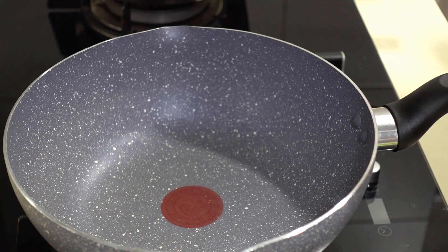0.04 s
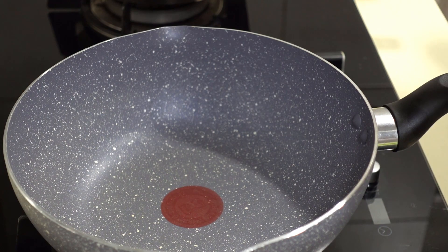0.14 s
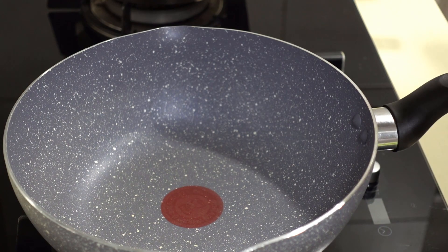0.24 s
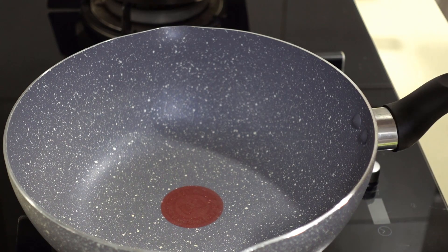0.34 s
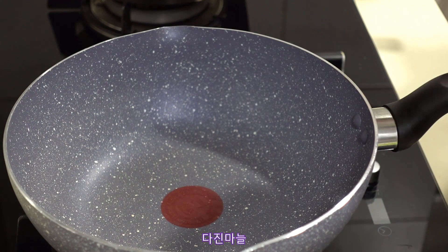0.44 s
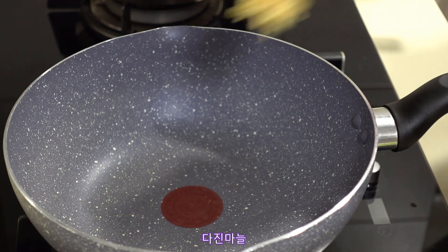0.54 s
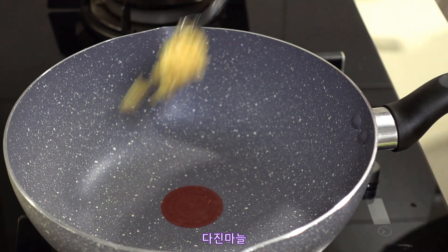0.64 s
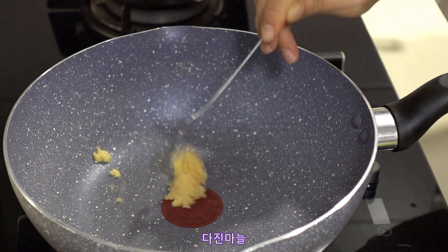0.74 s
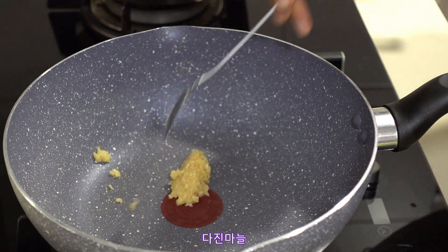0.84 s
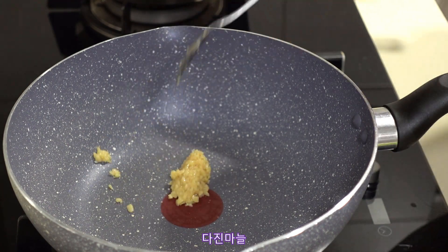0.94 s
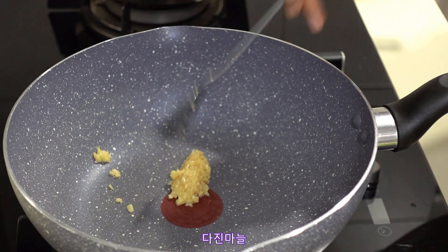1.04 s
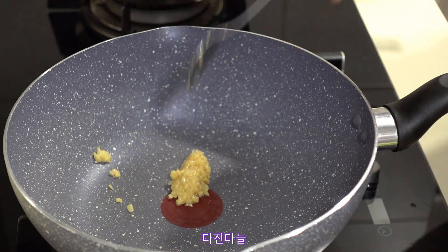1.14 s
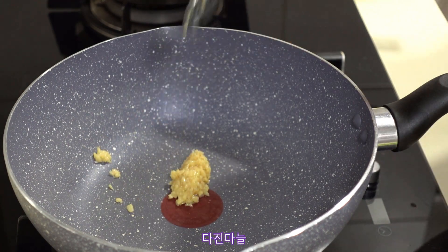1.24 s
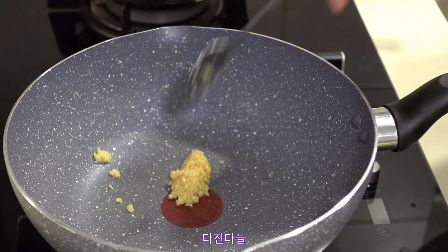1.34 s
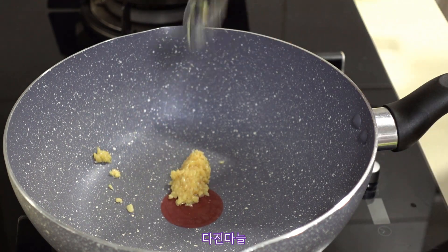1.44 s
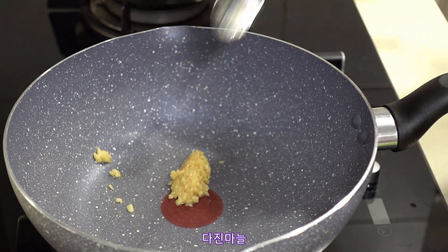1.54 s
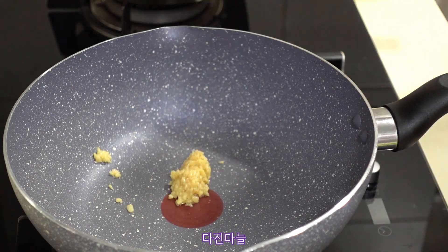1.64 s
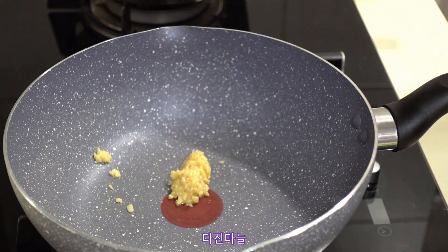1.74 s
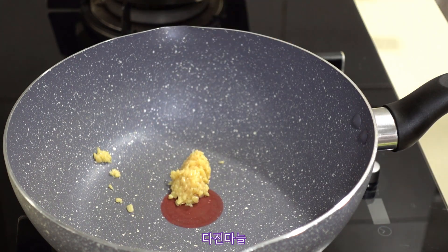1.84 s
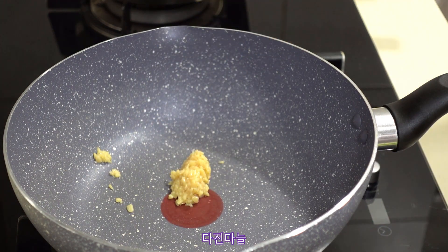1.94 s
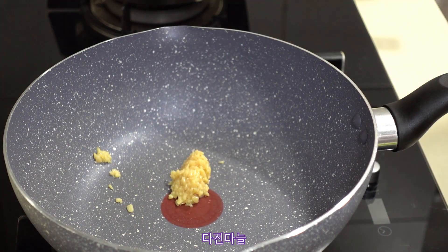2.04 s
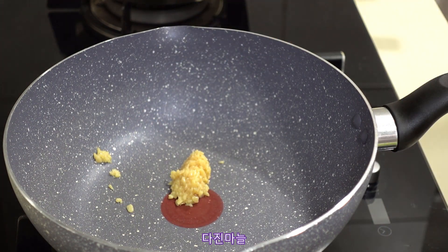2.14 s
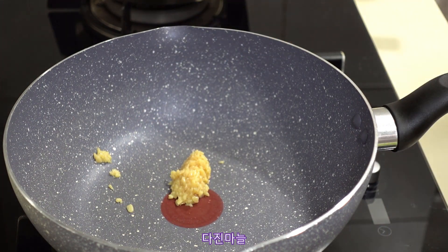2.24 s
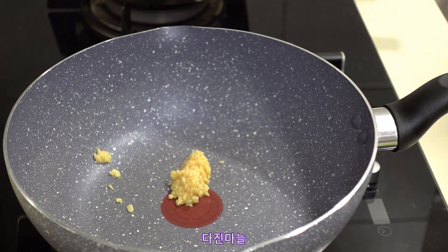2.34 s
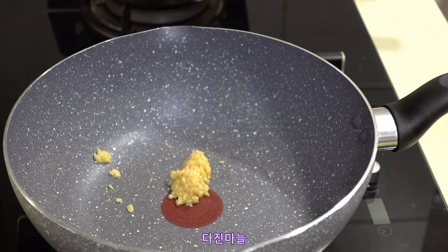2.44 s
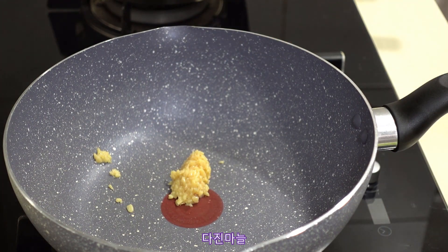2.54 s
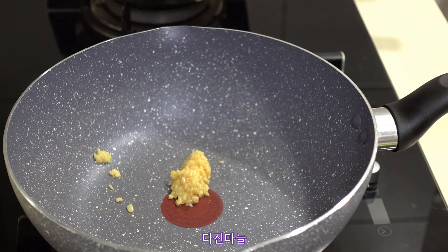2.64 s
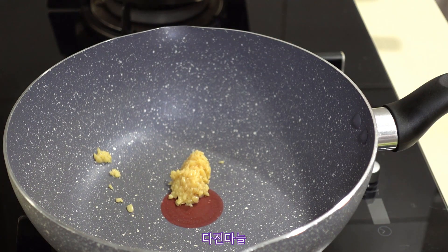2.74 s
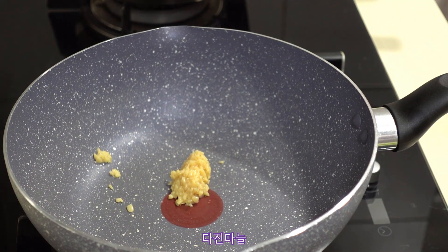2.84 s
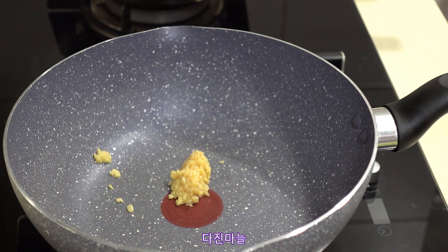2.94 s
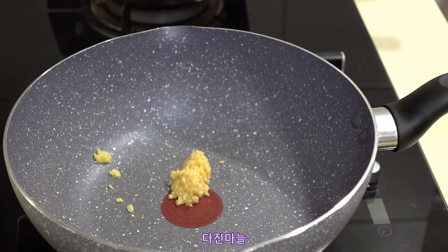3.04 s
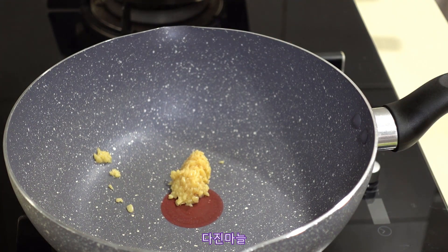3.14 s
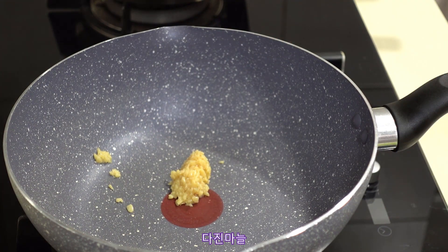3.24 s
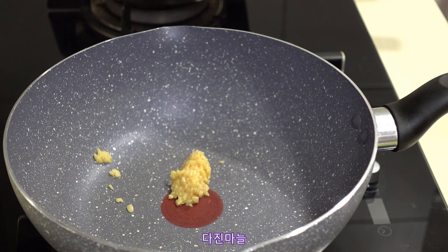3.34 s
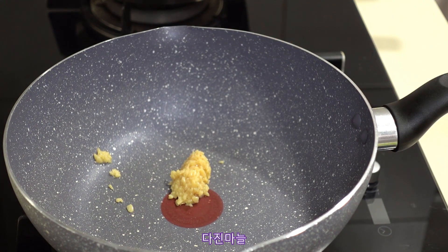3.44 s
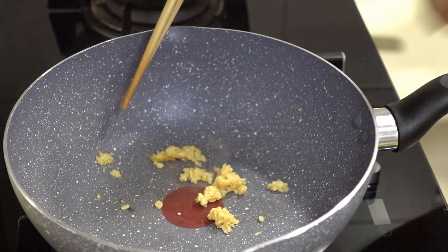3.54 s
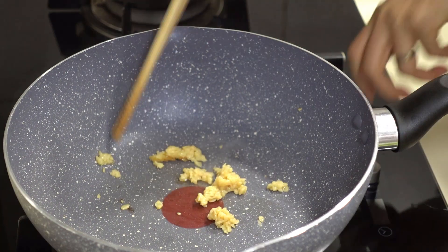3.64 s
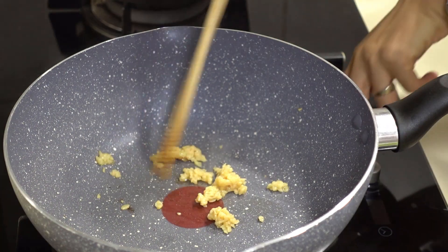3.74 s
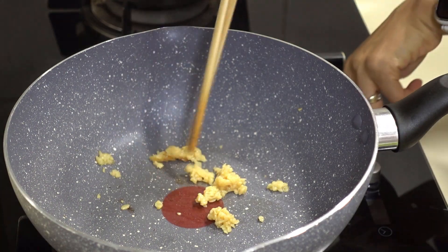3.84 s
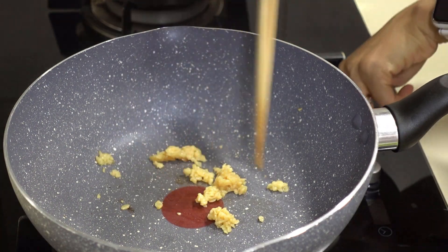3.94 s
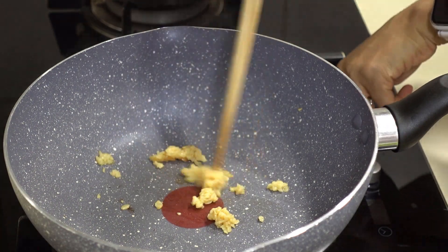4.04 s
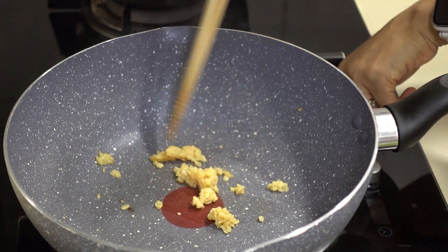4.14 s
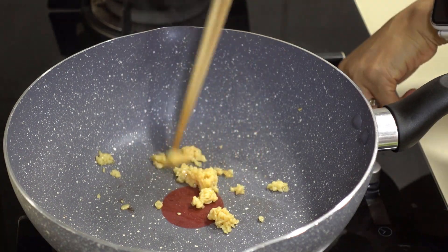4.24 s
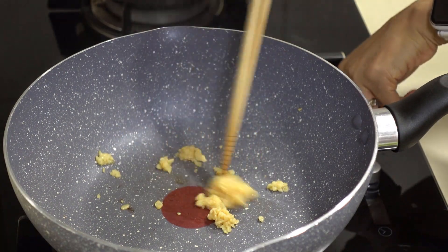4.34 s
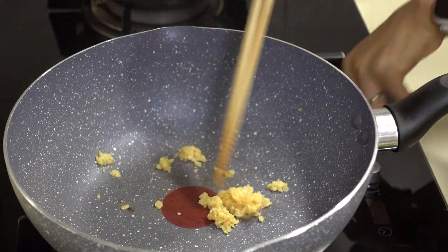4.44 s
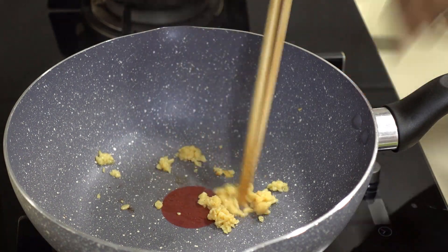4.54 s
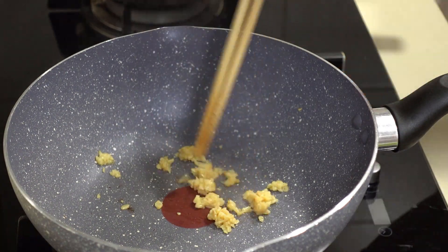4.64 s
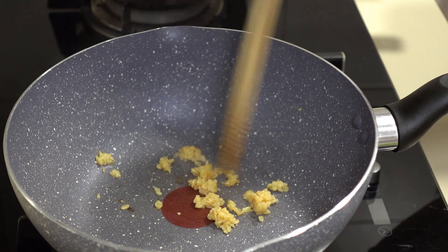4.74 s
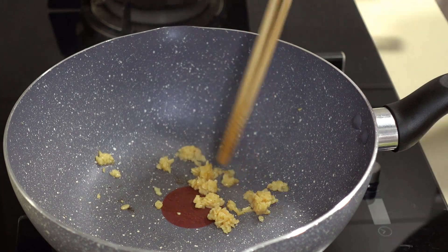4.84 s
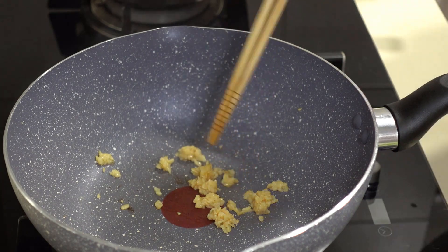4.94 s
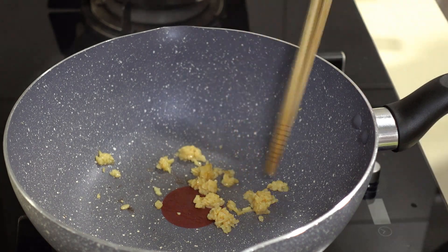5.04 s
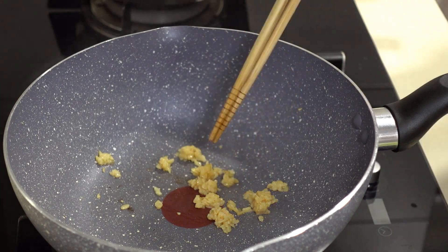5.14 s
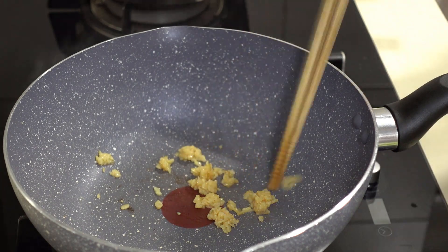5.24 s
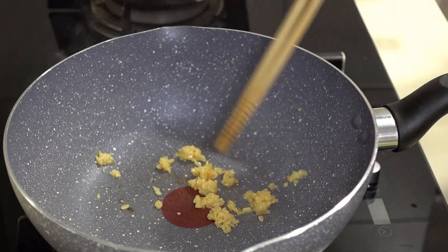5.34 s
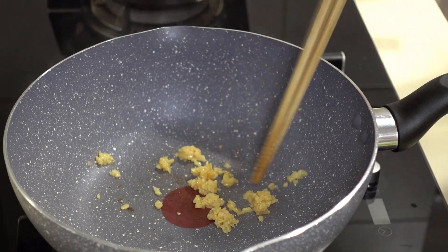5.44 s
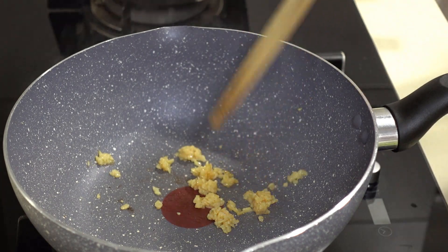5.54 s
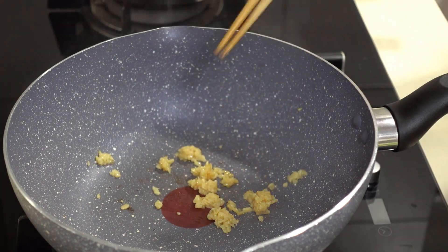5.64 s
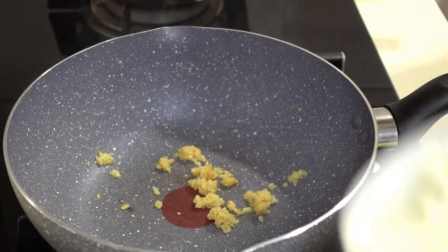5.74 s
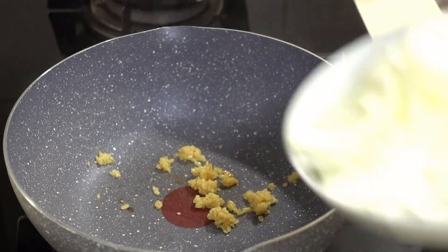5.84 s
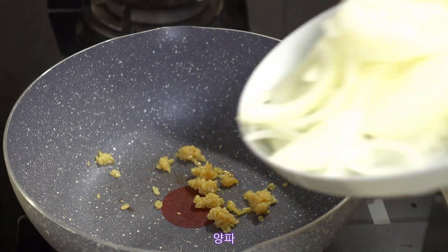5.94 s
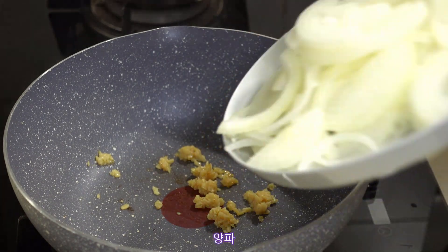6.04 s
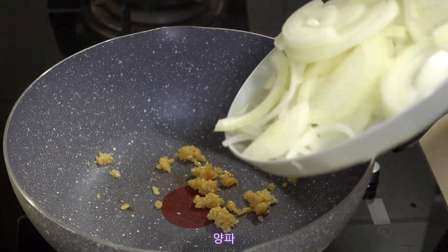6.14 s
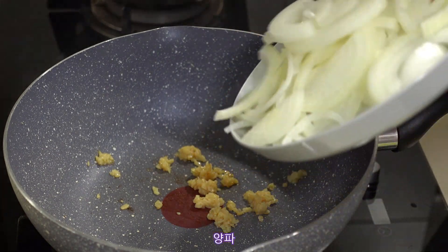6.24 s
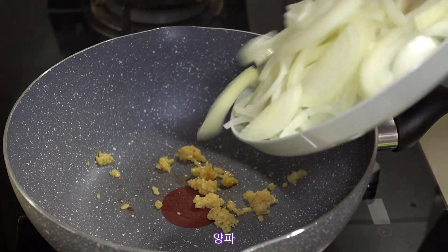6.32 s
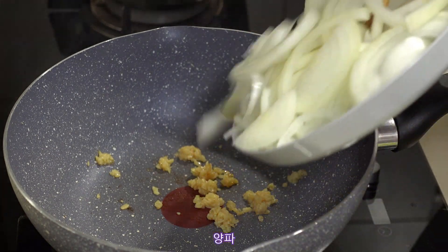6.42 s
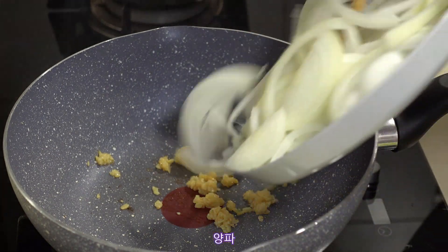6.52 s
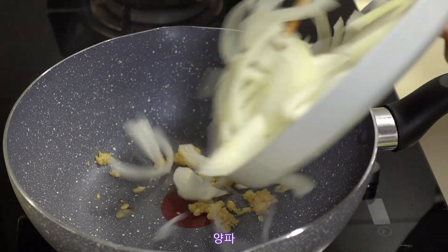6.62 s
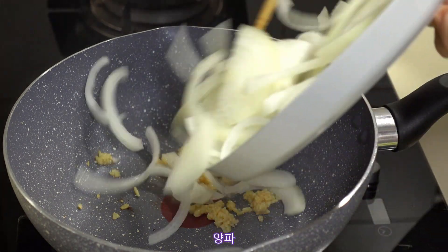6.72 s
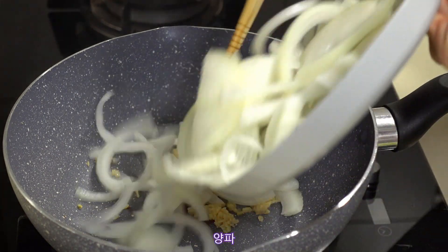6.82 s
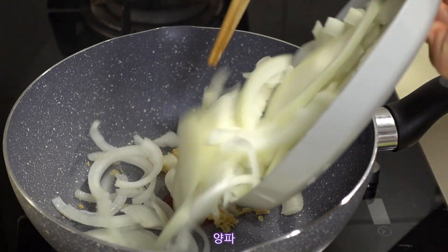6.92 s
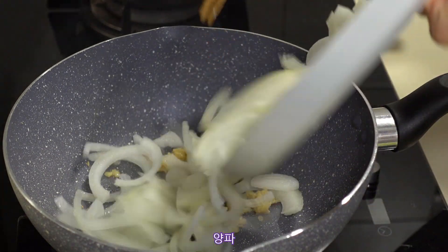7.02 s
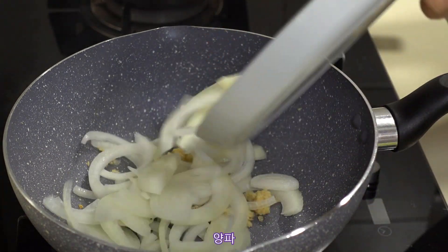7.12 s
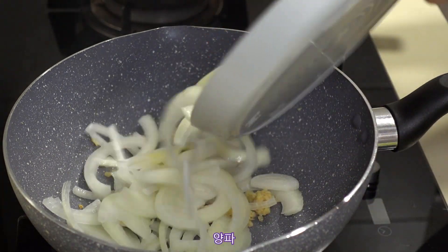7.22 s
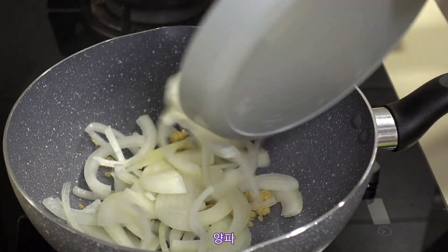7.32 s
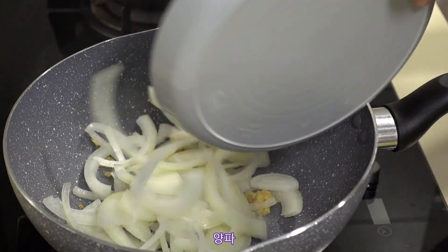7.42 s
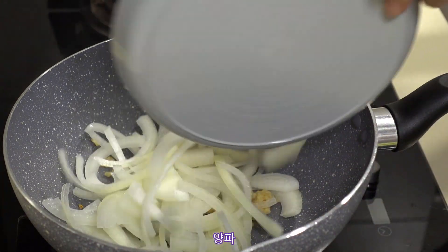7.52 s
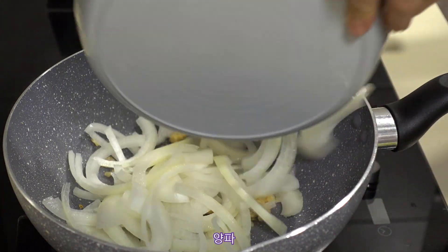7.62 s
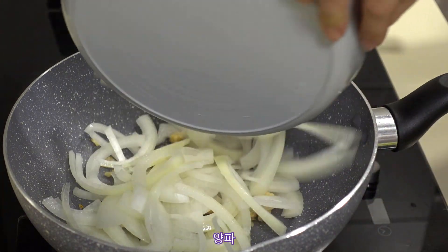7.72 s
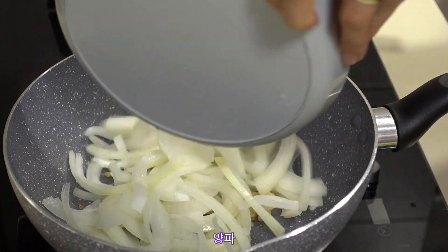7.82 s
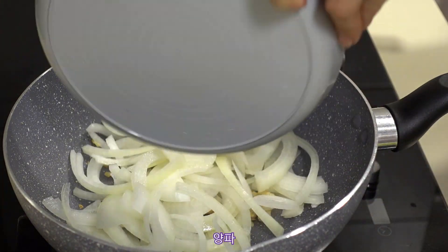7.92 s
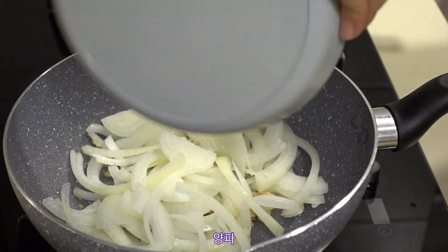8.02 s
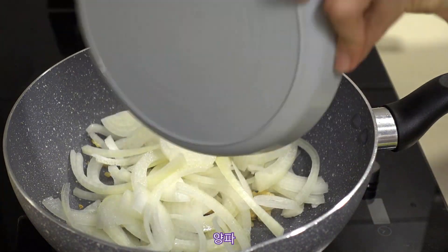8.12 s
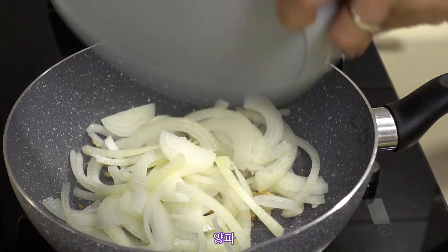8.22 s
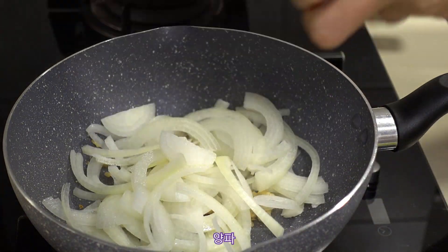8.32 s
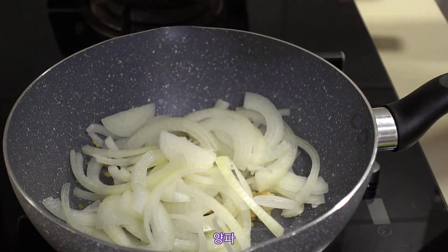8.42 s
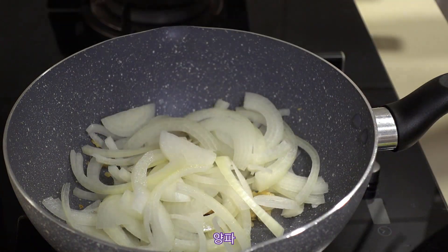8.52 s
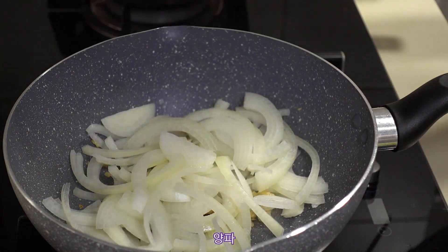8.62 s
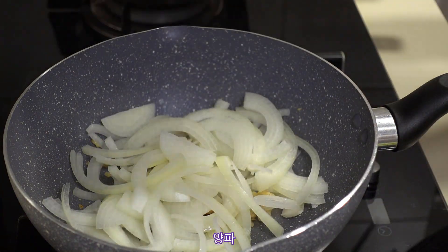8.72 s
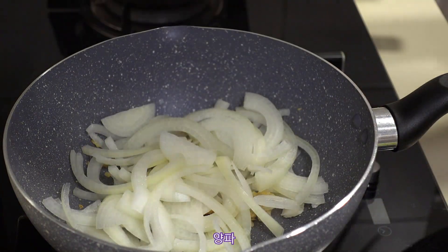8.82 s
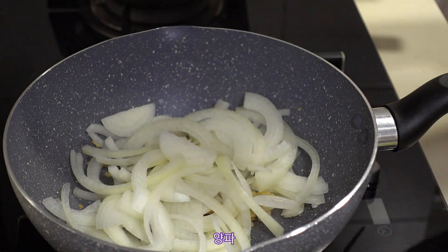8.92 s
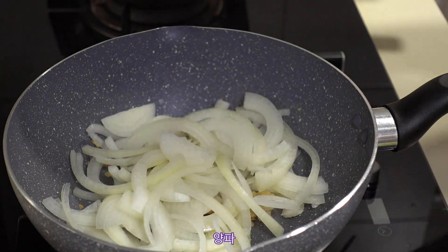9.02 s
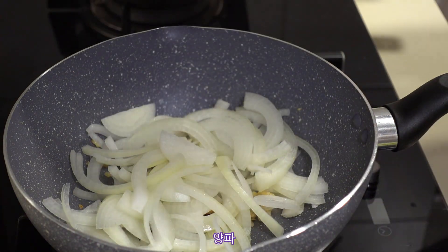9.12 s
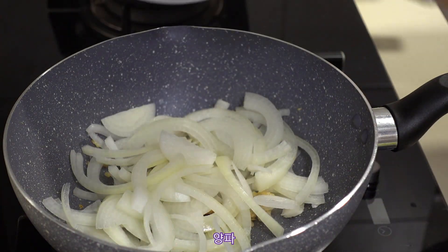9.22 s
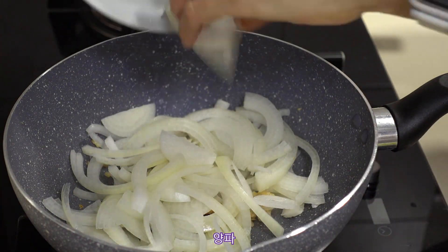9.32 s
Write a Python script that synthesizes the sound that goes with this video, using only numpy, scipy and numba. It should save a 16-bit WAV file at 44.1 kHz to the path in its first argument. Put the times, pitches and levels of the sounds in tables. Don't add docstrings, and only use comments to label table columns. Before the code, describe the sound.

Close, crisp pan frying bursts in after a spoon clink, swells wetter as onion lands with soft patters, and a plate scrapes the counter at the end.

```python
import sys
import numpy as np
from scipy import signal
from scipy.fft import rfft, irfft, next_fast_len
from scipy.io import wavfile
from scipy.ndimage import uniform_filter1d, map_coordinates
from numba import njit

SR = 44100
rng = np.random.default_rng(int(sys.argv[2]) if len(sys.argv) > 2 else 0)


def nominal_scale(level):
    x = np.asarray(level, float) / 20
    return 10 ** x


def master(y):
    cut = np.clip(np.atleast_2d(y).T, -1, 1)
    pcm = np.round(cut * 32767)
    wavfile.write(sys.argv[1], SR, pcm.astype(np.int16))


N = 413216
T = np.arange(N) / SR
CHANGE_S, FADE_S = 3.496, 0.032
LANDS_S, FLARE_S, FLARE_POWER, LAG_S = .725, .106, 1.1, 0.11

# (time [s], heat [dB], juice in the oil [0-1])
FRY_COURSE = [(.9, -1, 0.46), (1.21, 0, 0), (1.66, -0.5, 0), (2.1, 0.5, 0.08), (2.42, -1, 0.07),
              (2.47, 0.5, 0.05), (2.86, 0.5, 0.05), (3.3, 0, 0.1), (3.6, 0, .15), (4.03, 0, 0.18),
              (4.1, -2, 0.3), (4.5, -1, 0.16), (5.14, -1.5, 0.33), (5.8, -1, 0.39), (6.4, -2, 0.45),
              (7.2, 0, 0.45), (8.05, 0.5, 0.9), (9.37, 1, 0.79)]
BUBBLE_HZ = (10500, 7500, 4800, 2800, 1400)
# (frequency [Hz], density [dB per Hz])
FRY_SPECTRUM = [(240, -36), (400, -37), (581, -26.5), (723, -15), (941, -22), (1050, -34.5), (1130, -14),
                (2760, -8), (15000, 6.5), (15700, 7), (16500, -61)]
# (frequency [Hz], side minus mid [dB])
FRY_WIDTH = [(200, -11), (380, -19), (700, -10), (1290, -16), (2380, -9), (4400, -4.5), (8120, -4),
             (11300, 2), (13000, -2), (15000, -8.5)]
# (frequency [Hz], left minus right [dB])
FRY_LEFT_RIGHT = [(60, -6), (110, -1.5), (200, 0.0), (380, -16.5), (700, 0.0), (1290, 0.5), (2380, -0.5),
                  (4400, 0.5), (8120, -1.0), (15000, -2.5)]
# (time [s], middle bubble boost [dB], rise [s], fall [s])
FRESH_SURGES = [
    (2.6, 2, .12, 0.63),
    (4.3, 9, 0.22, 0.2),
    (5.53, 3.5, 0.22, 0.033),
    (5.82, 2, 0.064, 0.15),
    (6.85, 9, 0.33, 0.93),
    (8.3, 3, 0.68, 3.6),
]
# gain at full juice [dB], share of a fresh surge [ratio]
JUICE_DB, FRESH_SHARE = (0.5, 2.5, 7, 13, 4.5), (0, 0.69, 0.35, 0.17, 0.43)
# level missing as the food lands [dB], level still missing after [dB]
FLARE_DB, LAG_DB = (-50, -57, -36, -19, -13), (-1.5, 1, -9, -21, -3)
# (frequency [Hz], width [Hz], level [dB])
PAN_MODES = [(864, 5.5, -5), (951, 13, 8.5), (1817, 7.1, 5), (2130, 24, -15), (2960, 7.2, -2.5),
             (3215, 8.3, -5.5), (3526, 18, -1.5), (4400, 15, -2), (4710, 18, -6.5)]
RING_DB, BARE_DB, BARE_S, COVER_DB, DROP_RING = (2.5, -5.5), 10, 0.26, -11, 0.63
# (frequency [Hz], width [Hz], level [dB])
BOWL_MODES = [(5870, 91, -10), (6600, 69, -4.5), (7500, 320, -8.5), (8290, 180, -5), (8920, 120, -6.5),
              (9600, 52, -5), (10040, 31, -11), (10460, 88, -5), (11200, 88, -7), (13000, 140, -16),
              (13760, 97, -7), (14800, 280, -10)]
BOWL_COVER_DB = -9.5
# (frequency [Hz], width [Hz], level [dB])
ECHO_NOTCHES = [(1140, 83, -2.5), (3870, 530, -11.5)]
# (time [s], peak near 1.8 kHz [dB], hardness [dB per octave], rim mode pull [dB])
STICK_TAPS = [(0.2113, -54, -5, 11), (.7892, -51.5, -5, 2), (0.942, -50, 6, -9), (2.0928, -48.5, 13, 13),
              (2.66, -54, 12, 15), (2.7891, -51, 0, 22), (3.7523, -47, 1, -3), (4.8197, -37, 7, -3),
              (4.8387, -48, 14, -14), (5.291, -44.5, 11, -2), (5.4912, -44.5, 14, -9),
              (5.5114, -45, 12, -10), (5.5274, -47, 14, -8), (5.605, -46, 9, -9), (6.544, -46, 2, -7),
              (6.621, -46, -3, 0), (6.672, -51, -6, 2), (6.802, -47, -3.5, 4), (6.844, -41, 3.5, -3),
              (6.909, -46, -2, 0), (7.5744, -54, 14, 15)]
# (frequency [Hz], width [Hz], level [dB])
STICK_MODES = [(846, 16, 2), (958, 17.5, 5), (1800, 60, 11), (2500, 82, 4.5), (2836, 34, -1.5),
               (3230, 21, 2.5), (3390, 70, 2), (3523, 18, -4.5), (5720, 120, 6.5), (5960, 60, 3),
               (2600, 1700, -20), (5000, 4800, -30)]
RIM_MODE = 7
# (time [s], peak [dB], pitch [Hz], length [s])
SOFT_KNOCKS = [
    (2.599, -48, 463, 0.026),
    (2.688, -41, 803, 0.019),
    (4.564, -48, 865, 0.025),
    (4.692, -44, 820, 0.022),
    (6.44, -40, 950, 0.019),
    (6.945, -42.5, 757, 0.05),
    (7.039, -36, 998, 0.031),
    (8.99, -37.5, 740, 0.03),
    (9.129, -48, 486, 0.03),
]
# (time [s], peak [dB], pitch [Hz], length [s])
PAN_PATTER = [(2.181, -24, 3920, 0.0086), (2.606, -45, 1800, 0.015), (4.39, -30, 2410, 0.0086),
              (4.82, -45, 1790, 0.015), (5.2924, -39, 2500, 0.015), (6.5106, -40, 3040, 0.014),
              (6.546, -39, 2710, 0.015), (6.6243, -37, 2450, 0.015), (6.847, -31, 2100, 0.01),
              (6.8594, -46, 2310, 0.015), (6.909, -35, 1720, 0.013), (6.942, -30, 2460, 0.024),
              (6.959, -34, 2520, 0.015), (6.968, -34, 1870, 0.016), (7.044, -38, 2300, 0.016),
              (9.081, -33, 1150, 0.012), (9.3053, -38, 2500, 0.015)]
# (time [s], peak [dB], pitch [Hz], length [s])
COUNTER_THUMPS = [
    (2.606, -50, 159, 0.046),
    (9.308, -59, 211, 0.05),
]
# (frequency [Hz], width [Hz], level [dB])
SPOON_MODES = [(7300, 160, -5), (11050, 25, -7), (14100, 150, -9), (9000, 500, -2), (13000, 600, -5),
               (15000, 500, -8), (5670, 400, -6), (4400, 500, 5), (3340, 500, 7)]
SPOON_S, SPOON_DB = .211, -34
# (time [s], level [dB])
PLATE_SLIDE = [
    (8.98, -88),
    (8.998, -41),
    (9.028, -44),
    (9.07, -42),
    (9.084, -36.5),
    (9.202, -47.5),
    (9.22, -58),
]
# (frequency [Hz], width [Hz], level [dB])
PLATE_MODES = [(383, 30, -13), (473, 15, -0.5), (750, 35, -11), (950, 60, -8), (1150, 49, 3),
               (1450, 300, -3), (2200, 590, -3.5)]
# (frequency [Hz], density [dB per Hz])
HOOD_SPECTRUM = [(15, -58), (25, -40), (53, -35), (134, -3.5), (236, -1), (309, -19), (354, -15), (463, 3),
                 (531, -4), (1070, -1), (1520, -4), (4300, -19), (4800, -25), (9320, -30), (16000, -30)]
# (frequency [Hz], side minus mid [dB])
HOOD_WIDTH = [(40, -6), (110, -31), (200, -10), (400, -15), (1000, -13.5), (2400, -6), (5000, 0),
              (15000, 1)]
# (frequency [Hz], width [Hz], level [dB])
HOOD_MODES = [(98, 7.5, -7), (139.6, 9.8, 3), (353, 10, 1), (477.6, 3.9, 4), (713, 28, -1), (936, 55, -2),
              (2300, 120, -7), (3540, 200, -12), (3200, 350, -26), (4240, 200, -18), (7900, 90, -16),
              (9210, 110, -17), (10300, 160, -26)]
HOOD_DB = -51
TOP_HZ = 15830


def level(x, rms_db):
    return x * nominal_scale(rms_db) / np.sqrt(np.mean(x ** 2))


def at_hz(table, hz):
    f, v = np.transpose(table)
    return np.interp(np.log(hz + 1), np.log(f), v)


def colour(x, table):
    size = next_fast_len(N + SR // 4)
    hz = np.arange(size // 2 + 1) * SR / size
    return irfft(rfft(x, size) * nominal_scale(at_hz(table, hz)), size)[..., :N]


def resonate(x, modes):
    return sum(nominal_scale(db) * signal.lfilter(*signal.iirpeak(hz, hz / width, SR), x) for hz, width, db in modes)


def field(rate_hz, count):
    k = int(SR / rate_hz)
    rows = np.repeat(rng.standard_normal((count, N // k + 1)), k, axis=1)[:, :N]
    rows = uniform_filter1d(rows, k, axis=1)
    return rows / rows.std()


@njit
def rings(start, hz, width, mid, side):
    out = np.zeros((2, N))
    for g in range(len(start)):
        turn = np.exp((2j * np.pi * hz[g] - np.pi * width[g]) / SR)
        z = 1 + 0j
        for i in range(start[g], min(N, start[g] + int(1.8 * SR / width[g]))):
            out[0, i] += mid[g] * z.imag
            out[1, i] += (side[g] * z).imag
            z *= turn
    return out


def left_right(mid_side):
    mid, side = mid_side
    return np.array([mid + side, mid - side])


def bubbling(t):
    s, heat_db, juice = np.transpose(FRY_COURSE)
    juice = np.interp(t, s, juice)
    fresh = sum(db * np.exp(-((t - at) / np.where(t < at, rise, fall)) ** 2)
                for at, db, rise, fall in FRESH_SURGES)
    flare = np.clip(1 - (t - LANDS_S) / FLARE_S, 0, 3) ** FLARE_POWER
    lag = np.exp(-np.maximum(t - LANDS_S - FLARE_S, 0) / LAG_S)
    causes = (JUICE_DB, juice), (FRESH_SHARE, fresh), (FLARE_DB, flare), (LAG_DB, lag)
    db = sum(np.outer(per_size, course) for per_size, course in causes)
    return db + np.interp(t, s, heat_db), juice, fresh


def ringing(juice, fresh):
    bare = BARE_DB * np.exp(-np.maximum(T - LANDS_S - FLARE_S, 0) / BARE_S)
    return np.where(T < CHANGE_S, *RING_DB) + bare + COVER_DB * juice + DROP_RING * fresh


def frying(count=420000, sharp=5.35, scatter_db=0.16, biggest=6.3, surge_db=-0.4, sputter_db=.5,
           patchy_db=1.0, bowl_db=3.0):
    when, pitch, rarity, damping = rng.random((count, 4)).T
    normal = rng.standard_normal((count, 2)).T
    start = np.sort(when * (N - LANDS_S * SR) + LANDS_S * SR).astype(int)
    hz = 400 + 17200 * pitch ** 2

    heat_db = bubbling(start / SR)[0]
    place = np.interp(-np.log(hz), -np.log(BUBBLE_HZ), np.arange(len(BUBBLE_HZ)))
    db = map_coordinates(heat_db, [place, np.arange(count)], order=1)
    db += patchy_db * map_coordinates(field(20, count=8), [7 * pitch, start], order=1)
    db += (surge_db * field(18, count=1)[0] + sputter_db * field(45, count=1)[0])[start]

    db += scatter_db * np.minimum(-np.log(rarity), biggest)
    size = nominal_scale(db) * np.sqrt(hz * pitch / SR)
    side = size * nominal_scale(at_hz(FRY_WIDTH, hz)) * (normal[0] + 1j * normal[1]) / np.sqrt(2)
    burst = rings(start, hz, hz / (sharp * (.5 + damping)), size, side)
    burst = colour(burst, FRY_SPECTRUM)
    burst = burst - resonate(burst, ECHO_NOTCHES)

    _, juice, fresh = bubbling(T)
    wall = resonate(burst, PAN_MODES) * nominal_scale(ringing(juice, fresh) + 8)
    bowl = resonate(burst, BOWL_MODES) * nominal_scale(bowl_db + BOWL_COVER_DB * juice)
    left, right = left_right(burst + (wall + bowl) * [[1], [.6]])
    left = colour(left, [(f, db / 2) for f, db in FRY_LEFT_RIGHT])
    right = colour(right, [(f, -db / 2) for f, db in FRY_LEFT_RIGHT])
    return level(np.array([left, right]), -23.5)


def struck(s, db, hz, width, wide=0.38, contact_s=0.00037):
    size = nominal_scale(db)
    side = wide * size * np.exp(2j * np.pi * rng.random(len(size)))
    start = (np.asarray(s) * SR).astype(int)
    ring = rings(start, 1. * hz, 1. * width, size, side)
    swell = rings(start, 1. * hz, width + 1 / (np.pi * contact_s), size, side)
    return left_right(ring - swell)


def taps(bounce_s=0.0067, bounce_db=-6):
    s, db, hard, rim = np.transpose(STICK_TAPS)[:, :, None]
    hz, width, mode_db = np.transpose(STICK_MODES)[:, None, :]
    db = db + mode_db + hard * np.minimum(np.log2(hz / 1800), 1.1)
    db = db + rim * (np.arange(len(STICK_MODES)) == RIM_MODE)
    s, db, hz, width = (v.ravel() for v in np.broadcast_arrays(s, db, hz, width))
    second_s = s + bounce_s * (.5 + rng.random(len(s)))
    return struck(s, db, hz, width) + struck(second_s, db + bounce_db, hz, width)


def knocks(spread_octaves=0.384, knock_db=-5.5, scatter_db=-0.5, smear_s=.004):
    events = np.vstack([SOFT_KNOCKS, PAN_PATTER, COUNTER_THUMPS])
    s, db, hz, length_s = np.transpose(events)[:, :, None]
    scatter = rng.standard_normal((len(s), 3, 9)) * (np.arange(9) > 0)
    late, pitch, strength = scatter.transpose(1, 0, 2)
    s = s + smear_s * abs(late)
    db = db + knock_db - scatter_db * abs(strength)
    hz = hz * 2 ** (spread_octaves * pitch)
    width = 0.76 / np.maximum(length_s, .005)
    every = np.broadcast_arrays(s, db, hz, width)
    return struck(*(v.ravel() for v in every), wide=0.33, contact_s=0.00026)


def spoon(chatter_s=(0, .0025, .0105), chatter_db=(-2, -4, -11)):
    hz, width, db = np.transpose(SPOON_MODES)
    return sum(struck(SPOON_S + late + 0 * hz, SPOON_DB + db + strength, hz, width, contact_s=.0002)
               for late, strength in zip(chatter_s, chatter_db))


def plate(slips_hz=2500, slide_db=4.0):
    clicks = (rng.random(N) < slips_hz / SR) * rng.standard_normal(N)
    s, db = np.transpose(PLATE_SLIDE)
    slide = nominal_scale(np.interp(T, s, db, left=-120, right=-120))
    return level(resonate(clicks, PLATE_MODES), slide_db) * slide * [[1], [1.1]]


def kitchen(x, t60_s, db):
    t = np.arange(SR // 2) / SR
    tail = rng.standard_normal((2, len(t))) * np.exp(-np.log(1000) * t / t60_s) * (t > .003)
    tail = tail / np.sqrt(np.sum(tail[0] ** 2))
    return x + nominal_scale(db) * signal.fftconvolve(x, tail, axes=1)[:, :N]


def hood(tones_db=-3, far_bass_db=-9, far_db=2.0, duck_db=-3):
    noise = rng.standard_normal((4, N))
    rush = level(colour(noise[:2], HOOD_SPECTRUM), 0)
    drone = colour(resonate(noise[2:], HOOD_MODES), [(4300, 3), (5000, -26), (7000, -14), (7900, -3)])
    mid, side = rush + level(drone, tones_db)
    near = level(left_right([mid, colour(side, HOOD_WIDTH)]), HOOD_DB)
    near = near * nominal_scale(duck_db * (T > LANDS_S + FLARE_S))
    far = colour(near, [(90, -24), (170, far_bass_db), (240, -2), (330, -4.5), (450, -3.5),
                        (620, 1.0), (800, far_db)])
    return np.where(T < CHANGE_S, near, far) * nominal_scale(0.1 * field(2.6, count=1))


def rumble(rumble_db=-81):
    deep = colour(rng.standard_normal((2, N)), [(20, -31), (60, -16), (95, 3.0), (130, -26), (300, -70)])
    return level(left_right(deep * [[1], [.7]]) * nominal_scale(2.4 * field(7, count=1)), rumble_db)


def high_pass(x, order, hz):
    return signal.sosfilt(signal.butter(order, hz, "high", fs=SR, output="sos"), x)


def scene():
    near = high_pass(frying() + taps() + spoon() + plate(), 3, 280)
    thuds = high_pass(knocks(), 2, 130)
    return kitchen(near + thuds, t60_s=.15, db=-13) + hood() + rumble()


def roll_off(x):
    return signal.sosfilt(signal.butter(12, 16040, fs=SR, output="sos"), x)


def record(dry):
    fade = np.where(T < CHANGE_S, 1, np.clip((T - CHANGE_S) / FADE_S, .08, 1))
    steep = signal.ellip(14, .3, 80, TOP_HZ, fs=SR, output="sos")
    mix = signal.sosfilt(steep, dry * fade)
    return roll_off(mix)


dry = scene()
out = record(dry)
master(out)
```